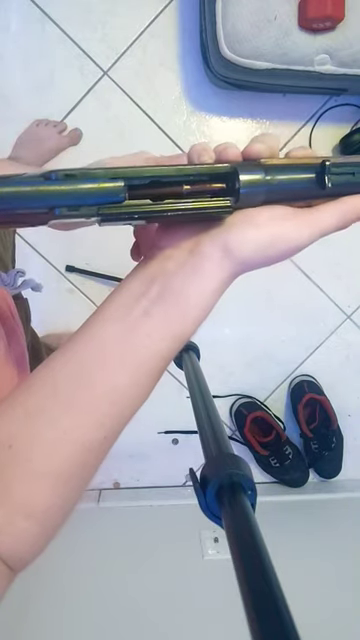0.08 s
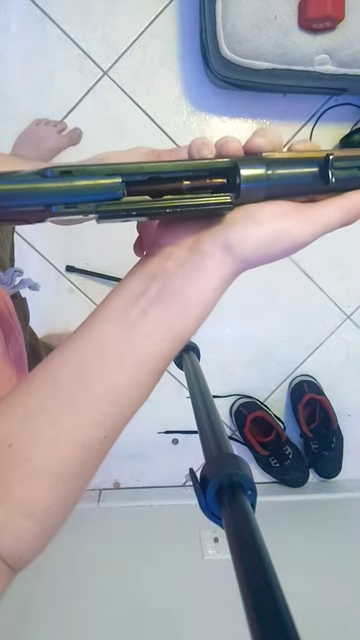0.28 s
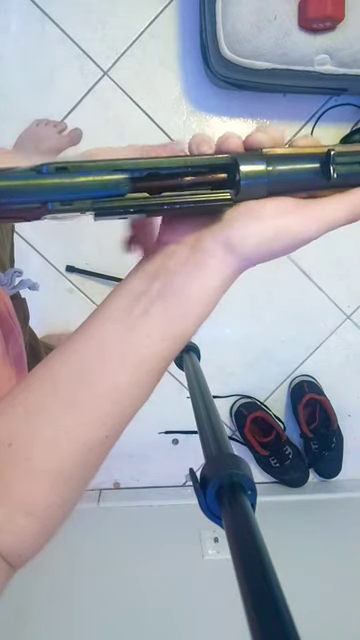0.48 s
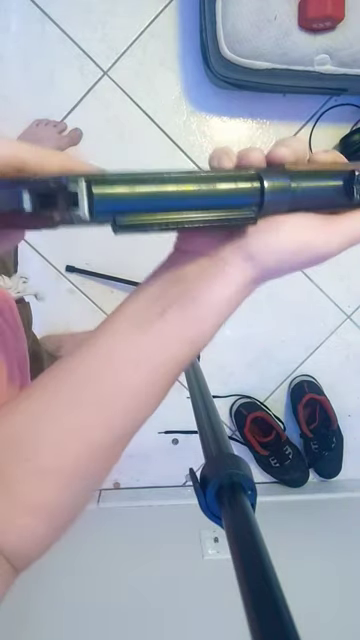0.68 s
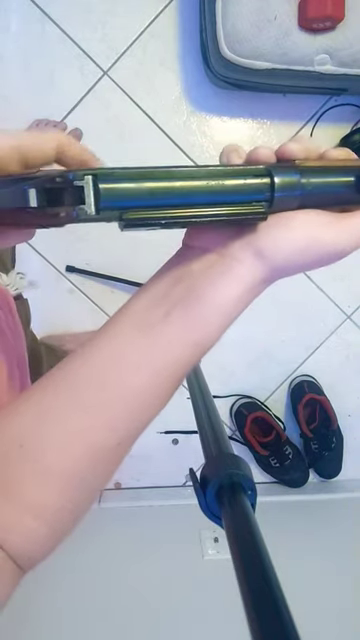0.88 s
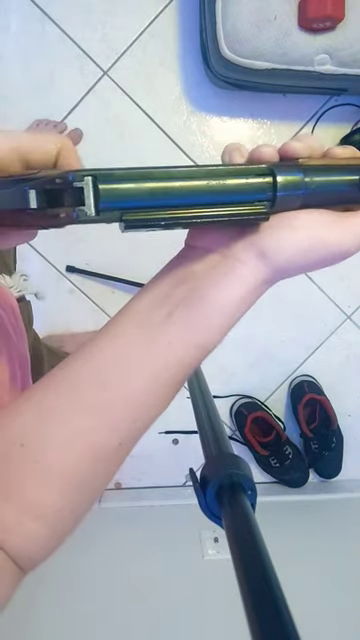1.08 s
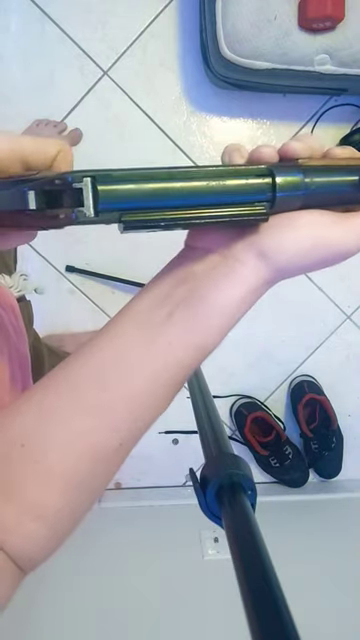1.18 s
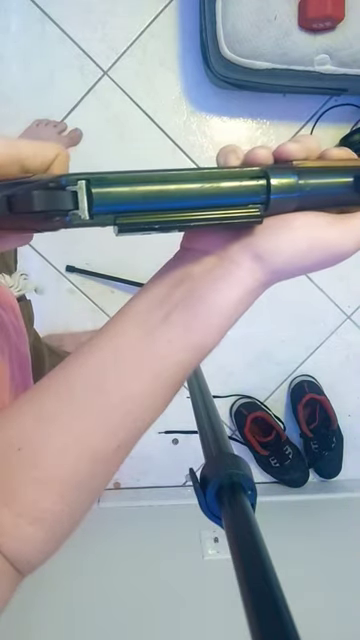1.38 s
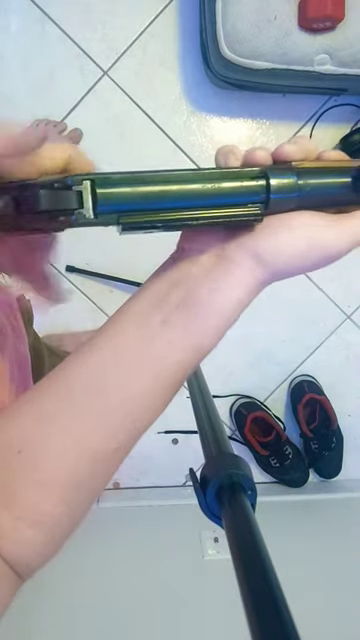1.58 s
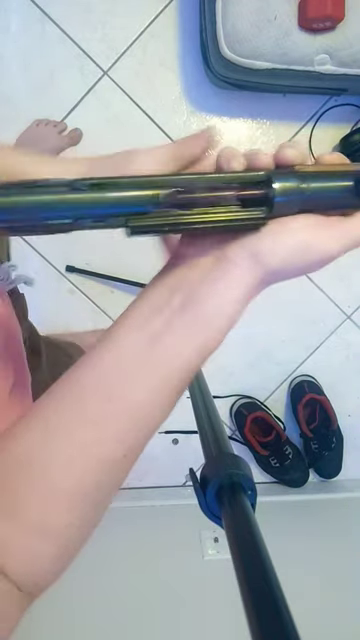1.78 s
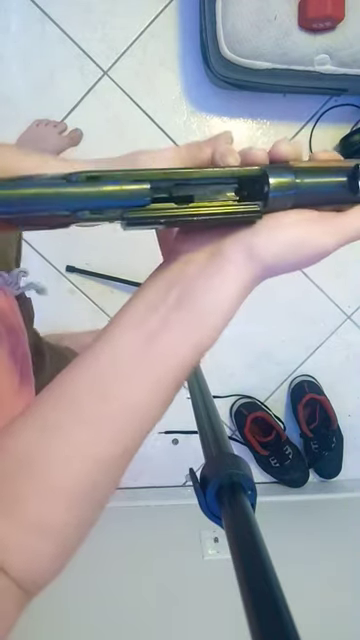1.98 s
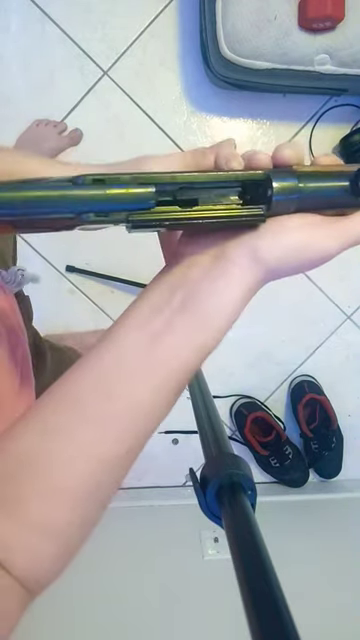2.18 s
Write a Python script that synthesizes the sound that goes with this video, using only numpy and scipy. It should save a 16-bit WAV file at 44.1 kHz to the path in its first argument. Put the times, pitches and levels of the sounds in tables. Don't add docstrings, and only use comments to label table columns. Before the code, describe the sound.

Metallic clacks of a lever rifle being cycled indoors, after a dummy cartridge bounces and tinkles on tiles

```python
import sys
import numpy as np
from scipy import signal
from scipy.fft import rfft, irfft
from scipy.io import wavfile
from scipy.ndimage import uniform_filter1d

SR = 44100
rng = np.random.default_rng(int(sys.argv[2]) if len(sys.argv) > 2 else 0)


def amplitude_ratio(level_db):
    exponent = np.asarray(level_db, float) / 20
    return 10 ** exponent


def materialize(psi):
    bounded = np.clip(np.atleast_2d(psi).T, -1, 1)
    quanta = np.round(bounded * 32767).astype(np.int16)
    wavfile.write(sys.argv[1], SR, quanta)


N = 99225
BOOST_DB = 2


def evened(x):
    return x / np.sqrt(np.mean(x ** 2) + 1e-20)


def read(points, hz):
    f, value = np.transpose(points)
    return np.interp(np.log(hz + 1), np.log(f + 1), value)


def colour(x, points):
    hz = np.fft.rfftfreq(len(x), 1 / SR)
    return irfft(rfft(x) * amplitude_ratio(read(points, hz)), len(x))


def resonate(noise, hz, width_hz):
    turn = np.exp(2j * np.pi * np.cumsum(hz) / SR)
    r = np.exp(-np.pi * width_hz / SR)
    return (turn * signal.lfilter([1], np.poly([r, r]), noise / turn)).real


def add(mix, s, sound):
    part = mix[round(s * SR):][:len(sound)]
    part += sound[:len(part)]


def ring(modes, detune):
    t = np.arange(SR // 16) / SR
    out = np.zeros(len(t))
    for (hz, db, t60), (a, b) in zip(modes, rng.random((len(modes), 2))):
        fade = amplitude_ratio(db - 2 * b - 60 * t / np.clip(t60, .01, .045))
        out += fade * np.sin(2 * np.pi * hz * (1 + detune * (a - .5)) * t)
    return out


def clack(modes, db, low_db, high_db, room_db):
    body = ring(modes, detune=0.1)
    t = np.arange(len(body)) / SR
    crack_t60, rise_s, modes_db, echo_modes_db = 0.013, 0.0012, -1, -33.5
    crack = rng.standard_normal(len(t)) * amplitude_ratio(-60 * t / crack_t60)
    tilt = [(60, low_db - 20.5), (250, low_db + 8.5), (800, low_db + 13.5), (1500, 0.014),
            (4500, 0.015), (7500, high_db), (15000, high_db - 8.5)]
    x = (crack + amplitude_ratio(modes_db) * body / np.sqrt(len(modes))) * np.minimum(t / rise_s, 1)
    blow = (t == 0) + amplitude_ratio(echo_modes_db) * body
    x, blow = [colour(np.pad(y, (300, 0)), tilt)[260:] for y in (x, blow)]
    x = amplitude_ratio(db + BOOST_DB) * x / abs(x).max()
    return x, amplitude_ratio(db + BOOST_DB + room_db + 8.5) * blow / np.linalg.norm(blow)


def strike_all(blows, modes, path):
    out = np.zeros((4, N))
    for k, (s, *how) in enumerate(blows):
        direct, blow = clack(modes, *how)
        add(out[0], s - 40 / SR, direct)
        add(out[1 + (path + k) % 3], s - 40 / SR, blow)
    return out


# f/Hz, level/dB
FLOOR = [(18, -49.5), (30, -6.5), (124, -14), (161, -5), (199, -20.5), (295, -22), (328, -23.5),
         (9220, -45.5), (16000, -51)]


def floor():
    hz = np.fft.rfftfreq(N, 1 / SR)
    fan_hz, fan_width_hz = 160.2, 15
    fan = irfft(rfft(rng.standard_normal(N)) / (1 + ((hz - fan_hz) / fan_width_hz) ** 2), N)
    rumble = colour(rng.standard_normal(N), FLOOR)
    rumble = signal.lfilter(*signal.butter(2, 50, "high", fs=SR), rumble)
    return amplitude_ratio(-57.5) * evened(rumble) + amplitude_ratio(-85.5) * evened(fan)


# centre t/s, length t/s, level/dB
RINGS = [(0.223, 0.011, -12), (.236, 0.018, -6), (.253, 0.024, -9), (0.265, 0.0095, -9.5),
         (0.277, 0.01, -5.5), (0.295, 0.02, -13), (0.322, 0.053, -13), (0.333, 0.0094, -10.5),
         (0.352, 0.027, -10.5), (0.434, 0.0075, -9), (0.447, 0.016, 0), (0.461, 0.015, -3.5),
         (0.48, 0.027, -2.5), (0.497, 0.011, -4), (0.519, 0.029, -8), (.545, 0.017, -10),
         (.565, .024, -9.5), (0.584, 0.017, -12), (0.6, 0.019, -5), (.611, 0.018, -6), (0.652, 0.058, -7),
         (0.678, 0.023, -5), (0.7, 0.027, -9.5), (.73, 0.026, -12.5), (0.806, 0.055, -21),
         (0.841, 0.043, -23), (0.897, 0.054, -36), (0.947, 0.06, -40.5), (1.018, 0.076, -51.5),
         (0.383, 0.059, -24.5)]


def case():
    out = np.zeros(N)
    for (s, length, db), (a, b) in zip(RINGS, rng.random((len(RINGS), 2))):
        t = np.arange(0, 1.05 * length, 1 / SR)
        hz = 12000 + 80 * (a - .5)
        swell = np.sin(np.pi * (t / t[-1]) ** .9)
        add(out, s - t[-1] / 2, amplitude_ratio(db + BOOST_DB) * swell * np.sin(2 * np.pi * (hz * t + b)))
    return out


# t/s, peak level/dB, low level/dB, high level/dB, room level/dB
BOUNCES = [(.2196, -1.5, -10, 3.5, -2.5), (.2241, 2.5, -20.5, -4, 5), (.2955, -5.5, -14, -41, 5.5),
           (.3335, -15.5, -36, 2, 6.5), (.4334, -5, -22, 0.5, 5.5), (.4405, -12, -18, -22, 17.5),
           (.4645, -8, -16.5, -7, 6.5), (.593, -10.5, -21.5, -1, 10), (.5973, -13, -25, -9, 5.5),
           (.6642, -8.5, -28, -5, 7), (.6745, -5, -26.5, -6, 5)]
# f/Hz, level/dB, t60 t/s
CARTRIDGE = [(300, -11, 0.0093), (574, -11, 0.019), (1390, -12.5, 0.014), (1990, 2.5, 0.0098), (5500, -1, 0.017),
             (8270, 4, 0.0046)]


def bounces():
    return strike_all(BOUNCES, CARTRIDGE, path=0)


# f/Hz, t60 t/s
ROOM = [(150, 0.64), (400, 0.5), (1200, 0.45), (3000, 0.34), (7000, 0.34), (12000, 0.31), (16000, 0.21)]


def room(x):
    taps = np.zeros(SR * 3 // 4)
    at = np.arange(60, len(taps) - 12, 12)
    build_up = np.minimum(at / SR / 0.0059, 1)
    taps[at + rng.integers(0, 12, len(at))] = rng.choice([-1., 1.], len(at)) * build_up
    hz, t, z = signal.stft(taps, SR, nperseg=256)
    fade = amplitude_ratio(-60 * t / np.clip(read(ROOM, hz), .05, 2)[:, None])
    tail = signal.istft(z * fade, SR, nperseg=256)[1]
    return signal.fftconvolve(x, tail / np.linalg.norm(tail))[:N]


# t/s, f/Hz, peak level/dB, t60 t/s
TICKS = [(.2335, 5200, -27, .02), (0.254, 5400, -14, .015), (.3035, 2110, -13, 0.014),
         (0.317, 4000, -19, .012), (.3325, 2350, -7, 0.019), (1.2734, 3920, -34.5, .05),
         (0.447, 1960, -4, 0.0094), (.468, 1330, -10.5, 0.029), (0.4832, 1920, -5.5, 0.013),
         (.4425, 14040, -14.5, .05), (0.493, 1440, -14, .015), (.5945, 13500, -12, .03),
         (.6478, 6820, -16.5, 0.016), (.662, 8000, -13, .009), (0.6683, 8200, -16, 0.012),
         (0.6733, 3740, -7, .015), (0.6763, 5830, -5.5, .02), (0.698, 3330, -16.5, .02),
         (.727, 2034, -9, 0.013), (0.7262, 6270, -7, .012), (0.7482, 6240, -14, .01),
         (0.756, 4740, -11, 0.0079), (0.7636, 7450, -17, 0.012), (0.7687, 6070, -6, 0.021),
         (.769, 1330, -11.5, 0.008), (0.7461, 5800, -7, .008), (.2965, 450.6, -18.5, .03),
         (0.772, 3870, -10.5, .015), (1.8175, 8400, -21, 0.0068), (.669, 13800, -12.5, .05),
         (1.835, 6000, -16, .01), (1.844, 8060, -11, 0.0073), (1.865, 7050, -16, 0.011),
         (1.87, 10000, -12, .008), (1.881, 5400, -9, .008), (1.8106, 5630, -4, .008),
         (1.898, 8400, -11.5, .007), (1.906, 8800, -20, 0.0054), (1.9247, 6800, -10, 0.011),
         (1.9299, 2900, -8, .012), (1.9284, 5500, -4, .009), (1.938, 3800, -4, 0.0083),
         (1.928, 11500, -8, .006), (1.9415, 5260, -14, .01)]


def ticks():
    out, t = np.zeros(N), np.arange(SR // 20) / SR
    for s, hz, db, t60 in TICKS:
        x = resonate(rng.standard_normal(len(t)), np.full(len(t), hz), width_hz=.25 * hz)
        x = x * np.minimum(t / 0.00093, 1) * amplitude_ratio(-60 * t / t60)
        add(out, s, amplitude_ratio(db) * x / abs(x).max())
    return out


# start t/s, length t/s, first f/Hz,
# last f/Hz, level/dB
KNOCKS = [(0.31, 0.079, 510, 330, -29.5), (.465, .15, 750, 147, -28), (.435, 0.13, 1750, 1330, -22),
          (.665, .13, 720, 620, -29.5), (1.94, 0.26, 2020, 2040, -36), (1.365, 0.27, 1320, 1540, -43),
          (1.365, 0.21, 3200, 3340, -30), (0.27, .09, 2070, 2200, -27.5), (1.884, 0.027, 6200, 5700, -21.5),
          (1.899, 0.041, 4100, 8000, -25), (1.955, 0.044, 2410, 2620, -22)]


def knocks():
    out = np.zeros(N)
    for s, length, first_hz, last_hz, db in KNOCKS:
        u = np.linspace(0, 1, round(length * SR))
        hz = first_hz * (last_hz / first_hz) ** u
        body = resonate(rng.standard_normal(len(u)), hz, width_hz=183 + .04 * first_hz)
        add(out, s, amplitude_ratio(db) * np.minimum(u * 20, 1) * (1 - u) * evened(body))
    return out


# t/s, peak level/dB, low level/dB, high level/dB, room level/dB
CLOSING = [
    (.6465, -16, -33, -2.5, 7),
    (.70, -15.5, -24, -2.5, 5),
    (.726, -7.5, -30.5, -8.5, 1.5),
    (.7413, 3.5, -31.5, 2, 0),
    (.7463, -2, -39.5, 1.5, 4.5),
    (.7629, -6, -21.5, 1.5, -5),
    (.7685, -1, -24, 4, 4.5),
    (.8642, -21.5, -24.5, 0.5, 16),
]
# f/Hz, level/dB, t60 t/s
BOLT = [(1510, -13.5, 0.015), (2050, -5.5, 0.013), (3660, -7.5, 0.017), (5800, -15.5, .015),
        (7460, -21, .015)]


def closing():
    return strike_all(CLOSING, BOLT, path=2)


# start t/s, end t/s, level/dB
SLIDES = [
    (0.647, 0.73, -23.5),
    (1.747, 1.884, -26.5),
    (1.959, 1.985, -23),
]
# f/Hz, level/dB
SCRAPE = [(180, -66), (300, -32.5), (1460, -19), (2030, -9.5), (4020, -16), (6100, -5), (10200, -10.5),
          (15000, -9.5), (16000, -39.5)]
# t/s, f/Hz
RAIL = [(1.75, 5090), (1.84, 5500), (1.87, 6600), (1.9, 4540), (1.93, 6500)]


def slides():
    t = np.arange(N) / SR
    scrapes_per_s, spread_db, edge_s = 12000, 1.8, .012
    hits = rng.random(N) < scrapes_per_s / SR
    grit = amplitude_ratio(spread_db * np.minimum(rng.exponential(1, N), 5)) * hits * rng.standard_normal(N)
    stroke = np.zeros(N)
    for start, end, db in SLIDES:
        stroke += amplitude_ratio(db + BOOST_DB) * np.clip(np.minimum(t - start, end - t) / edge_s, 0, 1)
    squeal = resonate(grit, np.interp(t, *np.transpose(RAIL)), width_hz=800)
    squeal = amplitude_ratio(-9) * (t > RAIL[0][0]) * evened(squeal)
    return stroke * (evened(colour(grit, SCRAPE)) + squeal)


# t/s, peak level/dB, low level/dB, high level/dB, room level/dB
HAMMER = [
    (1.1594, -54.5, -15, 6.5, -19.5),
    (1.274, -30, -15.5, 3.5, 3.5),
    (1.281, -44, -29.5, 15.5, -2),
    (1.3545, -7.5, -10.5, 5, -5),
    (1.3615, 5.5, -21.5, 4.5, 0),
    (1.3833, -8, -56, 10, 12.5),
    (1.4573, -13, -29.5, 8, 14.5),
]
# f/Hz, level/dB, t60 t/s
STRIKER = [(1425, 0.5, 0.016), (3310, -6, 0.052), (5230, 1.5, 0.014), (6500, 4.5, 0.0079), (7570, 1, 0.016),
           (9740, 1, 0.018), (13720, -1, 0.046)]


def hammer():
    return strike_all(HAMMER, STRIKER, path=1)


def thump():
    t = np.arange(N) / SR
    u = np.maximum(t - 1.361, 0)
    v = np.clip((t - 1.437) / 0.12, 0, 1)
    hum_hz = 98.9
    knock = amplitude_ratio(-8 - 60 * u / 0.017) * np.sin(2 * np.pi * 91.4 * u)
    shiver = amplitude_ratio(-42 - 60 * u / 1.12) * np.sin(2 * np.pi * hum_hz * u)
    sway = amplitude_ratio(-47 - 60 * u / 0.8) * np.sin(2 * np.pi * 30 * u)
    beat = 1 + np.cos(2 * np.pi * 26 * u) / np.pi
    hum = amplitude_ratio(-42) * np.sin(np.pi * v) ** 0.32 * beat * np.sin(2 * np.pi * hum_hz * t)
    return knock + shiver + sway + hum


# t/s, peak level/dB, low level/dB, high level/dB, room level/dB
OPENING = [(1.655, -38, -18, -15, -3), (1.666, -26, -25, -2.5, 3), (1.671, -27.5, -27, 11.5, 0.5),
           (1.7505, -18, -24, 10, -22), (1.7535, -1, -32, 12, 3.5), (1.7828, -6.5, -34, 12, -8),
           (1.8093, -3, -30, 10.5, 4.5), (1.8812, -15.5, -41, 6, 4), (1.8985, -19, -37, 8.5, 12),
           (1.9275, 2, -25, 9, 0.5), (1.9368, 0, -49, 1.5, -2.5), (2.0295, -18.5, -30.5, 2.5, 14)]
# f/Hz, level/dB, t60 t/s
LEVER = [(600, -2, 0.034), (1997, -11, 0.071), (2586, -6.5, 0.033), (3706, -3.5, 0.027),
         (5335, 7.5, 0.0086), (7090, 0.5, 0.013), (8660, 1, 0.0076), (10000, -13, 0.024)]


def opening():
    return strike_all(OPENING, LEVER, path=2)


def scene():
    hits = bounces() + closing() + hammer() + opening()
    near, sends = hits[0], hits[1:]
    grit, brass, rattle = slides(), case(), ticks()
    sends[0] += grit
    sends[1] += amplitude_ratio(-17) * brass
    wet = sum(room(x) for x in sends) + amplitude_ratio(-7.5) * room(rattle)
    return (near + grit + brass + rattle + wet + thump() + knocks())[None]


def top_cut(x):
    return signal.sosfilt(signal.butter(12, 16780, fs=SR, output="sos"), x)


def record(dry):
    dry = signal.lfilter(*signal.butter(1, 67.3, "high", fs=SR), dry)
    power = uniform_filter1d(dry[0] ** 2, 200)
    power_db = 10 * np.log10(abs(power) + 1e-12)
    fall = np.arange(N) * 135.5 / SR
    over_db = np.maximum(np.maximum.accumulate(power_db + fall) - fall + 18, 0)
    r = np.exp(-1 / (0.0032 * SR))
    squeeze_db = .25 * signal.lfilter([1 - r], [1, -r], over_db)
    under_db = np.clip(-46 - uniform_filter1d(power_db, 800), 0, 30)
    gated = dry / amplitude_ratio(0.38 * under_db)
    dip_hz, dip_width_hz = 958, 150
    dip = signal.lfilter(*signal.iirpeak(dip_hz, dip_hz / dip_width_hz, fs=SR), gated)
    x = np.tanh((gated - .4 * dip) / amplitude_ratio(squeeze_db) + floor())
    edge = signal.firwin(255, 15550, window=("kaiser", 7), fs=SR)
    x = signal.oaconvolve(x, edge[None], "same")
    return top_cut(x)


dry = scene()
out = record(dry)
materialize(out)
```